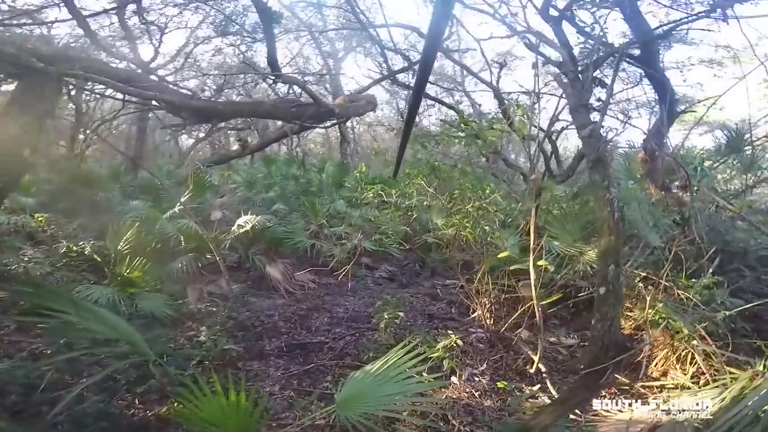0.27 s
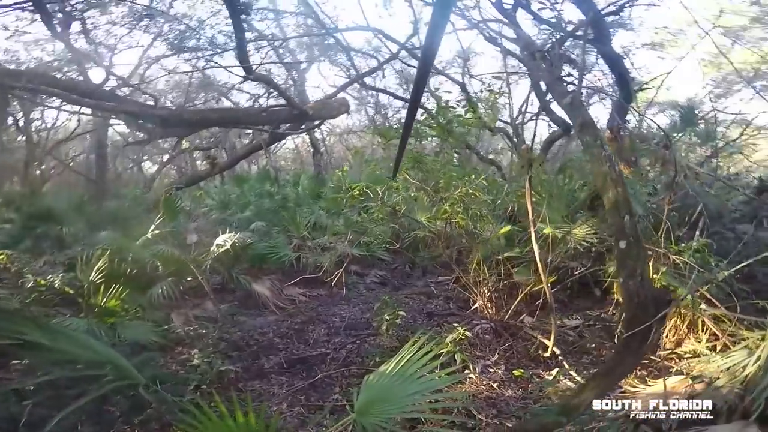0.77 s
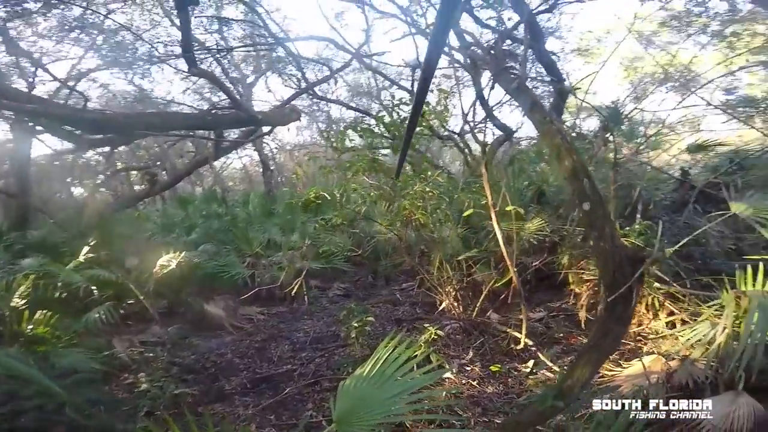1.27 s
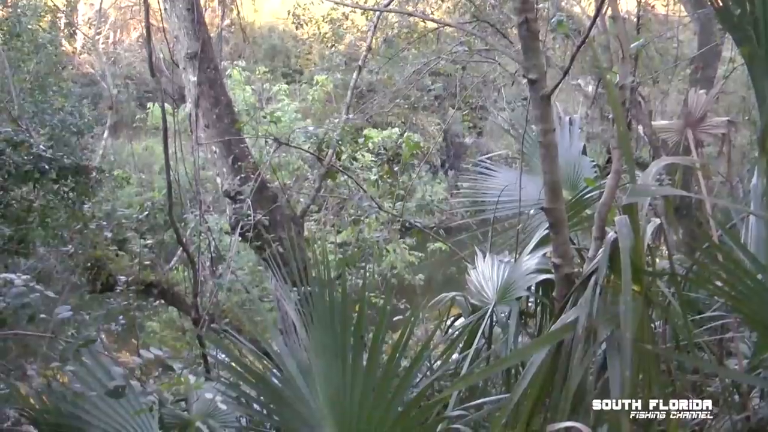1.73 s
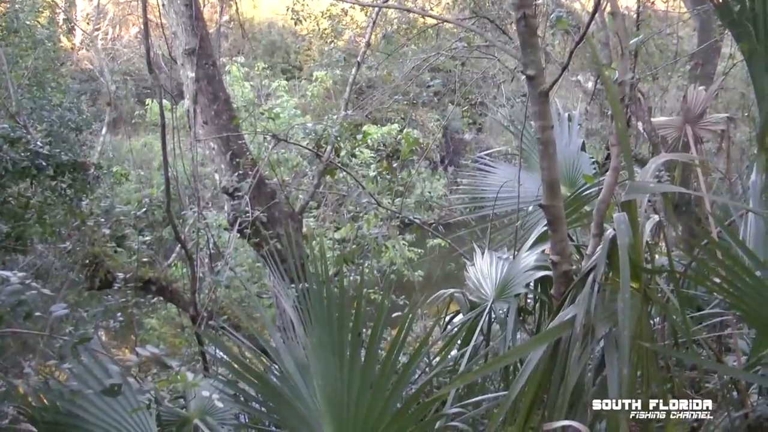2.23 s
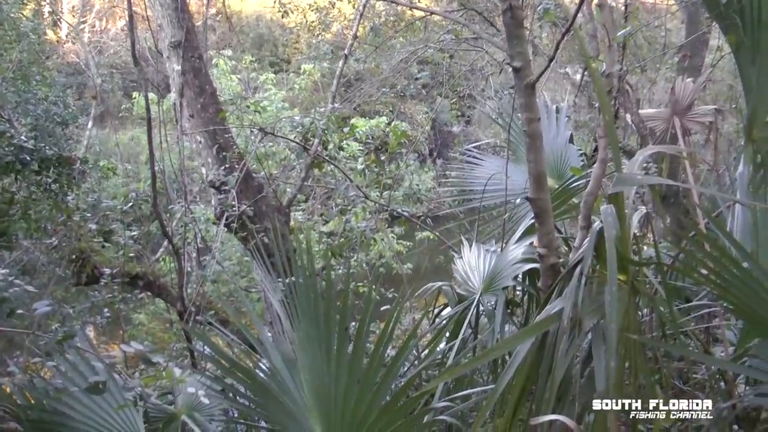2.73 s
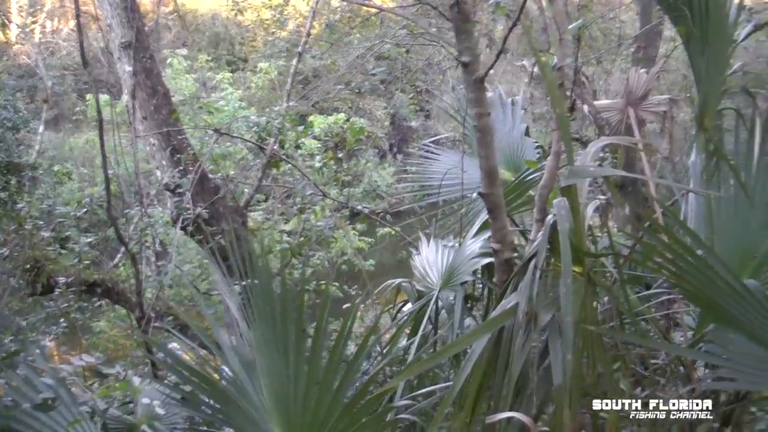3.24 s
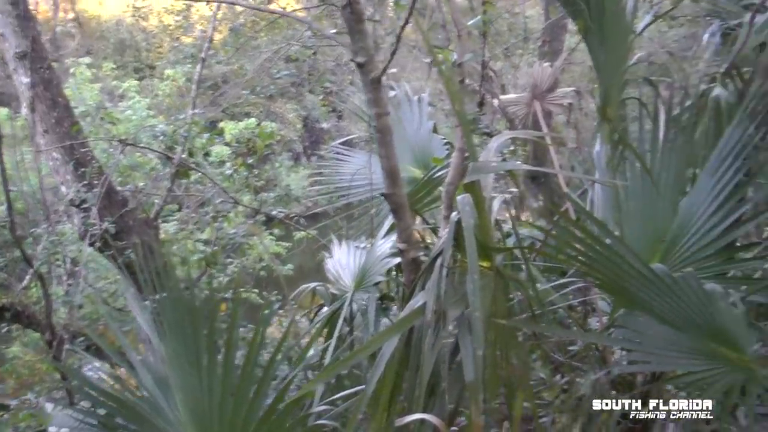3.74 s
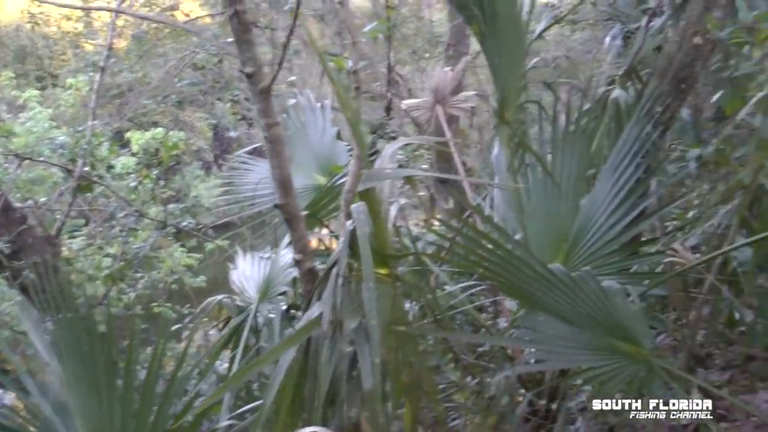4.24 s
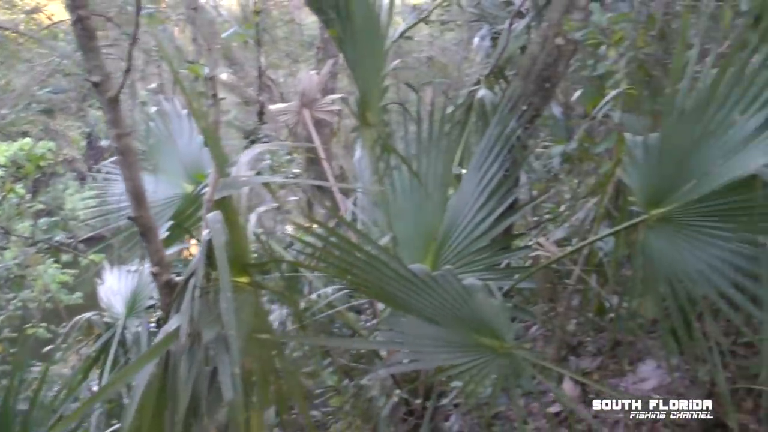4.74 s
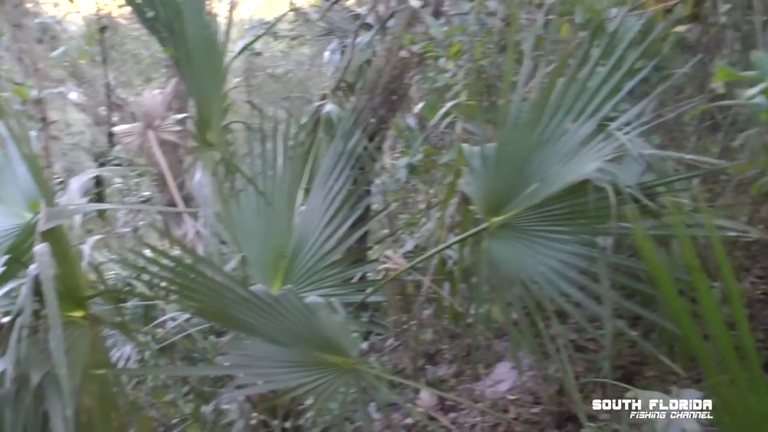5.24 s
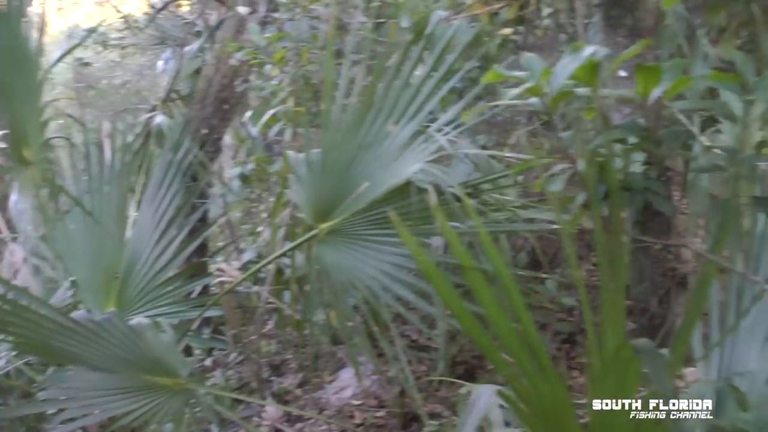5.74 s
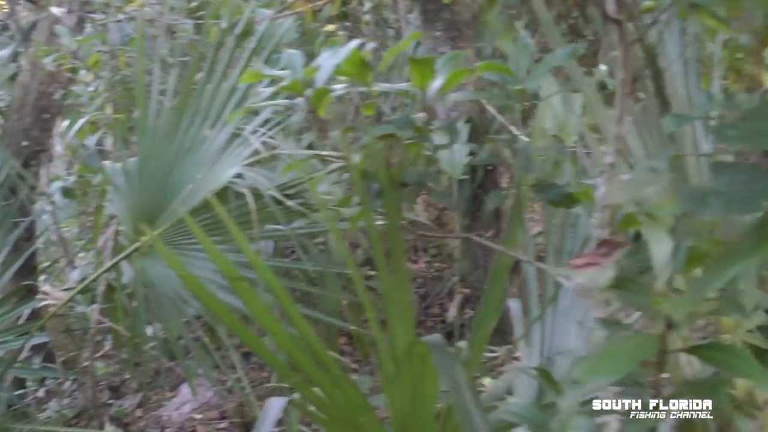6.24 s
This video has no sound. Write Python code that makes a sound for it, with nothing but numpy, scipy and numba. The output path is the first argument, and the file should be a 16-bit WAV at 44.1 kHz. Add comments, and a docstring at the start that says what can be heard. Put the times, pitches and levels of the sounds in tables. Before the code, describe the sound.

At first the microphone is shut inside a plastic housing on a swaying pole: a muffled low hum, a few knocks and small creaks. A sudden cut opens onto woodland in stereo, with a high cricket chorus, soft hiss, rumble and a distant wavering drone. Two nearer crickets repeat double chirps. Dry palm fronds swish and tick lightly as someone brushes past, while the drone and chorus slowly grow louder.

```python
"""Woodland in two scenes. First, inside a closed housing on a swaying pole, the pole's bending modes hum
low, knocks ring its stiffer modes, and the plastic creaks by stick-slip over a muffled hiss. At 1.64 s
a hard cut leads to open air in stereo: rumble, a far drone with a wavering tone, hiss and a chorus of
stridulating crickets. Then two near crickets chirp, and dry palm fronds swish and tick as someone
brushes past. Drone and chorus grow slowly louder, the drone faster towards the end."""
import sys
import numpy as np
from scipy import signal
from scipy.fft import rfft, irfft
from scipy.io import wavfile
from scipy.ndimage import uniform_filter1d
from numba import njit

SR = 44100
rng = np.random.default_rng(int(sys.argv[2]) if len(sys.argv) > 2 else 0)


def digitize_waveform(pressure):
    """Quantize a signal to 16-bit integers and store it at the path in sys.argv[1].

    Rows of a 2-D input are taken as channels; values are limited to [-1, 1].
    """
    field = np.atleast_2d(pressure).T
    bounded = np.clip(field, -1, 1)
    quanta = np.round(bounded * 32767).astype(np.int16)
    wavfile.write(sys.argv[1], SR, quanta)


N = 286650
TIME = np.arange(N) / SR
CUT_S, GAP_S, FADE_S = 1.6365, .007, .006

def undb(db):
    """Amplitude ratio of a level in decibels."""
    return 10 ** (np.asarray(db) / 20)

def at_rms(x, db):
    """Normalisation to an rms level."""
    return x * undb(db) / np.sqrt(np.mean(x ** 2))

def curves(table):
    """Linear interpolation of each column over time."""
    times, *columns = np.transpose(table)
    return [np.interp(TIME, times, column) for column in columns]

def lookup(table, hz):
    """Interpolation on a logarithmic frequency axis."""
    f, values = np.transpose(table)
    return np.interp(np.log(np.maximum(hz, 1)), np.log(f), values)

def resonate(x, modes):
    """Modal superposition: parallel resonators (f/Hz, bandwidth/Hz, gain/dB) driven by x."""
    return sum(undb(db) * signal.lfilter(*signal.iirpeak(hz, hz / width, fs=SR), x)
               for hz, width, db in modes)

def wander(rate):
    """Random modulation: `rate` values a second, smoothed twice; spread near 1."""
    hold = int(SR / rate)
    steps = np.repeat(rng.standard_normal(N // hold + 1), hold)
    return 1.3 * uniform_filter1d(uniform_filter1d(steps, hold), hold)[:N]

def impulses(events):
    """Impulse train from rows of t/s, level/dB."""
    out = np.zeros(N)
    for start, db in events:
        out[int(start * SR)] += undb(db)
    return out

def bursts(events, attack_s, decay_s):
    """Convolution gives each impulse an exponential rise and decay."""
    t = np.arange(int(6 * decay_s * SR)) / SR
    envelope = np.exp(-t / decay_s) * (1 - np.exp(-t / attack_s))
    return signal.fftconvolve(impulses(events), envelope)[:N]

# Likeness of left and right: f/Hz, correlation/1
CORRELATION = [(60, 0.92), (130, 0.97), (290, 0.83), (640, 0.61), (1410, .67), (3100, 0.72), (6820, 0.58),
               (9000, 0.98), (10000, 1), (15000, 1.0)]
# Left minus right: f/Hz, level/dB
BALANCE = [(60, -1), (110, 1), (200, 1), (380, -3), (700, -3.5), (1290, -3.0), (2380, -1.5), (4400, 0),
           (8120, 0), (15000, 0.5)]
def noise_field(spectrum, flicker_db, rate, wide=1):
    """Partially coherent stereo noise of rms 1; each octave flickers independently."""
    hz = np.fft.rfftfreq(N, 1 / SR)
    common, own = rfft(rng.standard_normal((2, N)))
    correlation = np.clip(1 - wide * (1 - lookup(CORRELATION, hz)), 0, 1)
    lean = undb(wide * lookup(BALANCE, hz) / 2)
    side = np.sqrt((1 - correlation) / (1 + correlation)) * own
    stereo = undb(lookup(spectrum, hz)) * np.array([(common + side) * lean, (common - side) / lean])
    stereo *= (hz > spectrum[0][0]) & (hz < spectrum[-1][0])
    octave = np.log2(np.maximum(hz, 1) / 30)
    bands = (irfft(stereo * np.clip(1 - abs(octave - k), 0, 1), N) for k in range(-1, 11))
    return at_rms(sum(band * undb(flicker_db * wander(rate)) for band in bands), 0)

# Low bending mode of the pole: t/s, f/Hz, level/dB
SWAY = [(0.0, 35.7, -33), (0.054, 36, -38), (0.098, 35.6, -20), (0.18, 36.4, -26.5), (0.272, 37.1, -41),
        (0.38, 36.3, -26.5), (0.548, 37.1, -39.5), (0.576, 37.0, -32), (0.594, 36.9, -44),
        (0.622, 36.3, -30.5), (0.676, 34.4, -33), (0.93, 34.25, -34), (0.998, 34.4, -51),
        (1.056, 34.4, -34), (1.106, 34.4, -31.5), (1.166, 34.3, -46), (1.248, 34.3, -34),
        (1.334, 35.5, -40), (1.38, 35.5, -31.5), (1.438, 35.4, -36.5), (1.548, 35.8, -24.5),
        (1.63, 35.7, -24.5)]
# Jolts that excite the upper mode: t/s, level/dB
JOLTS = [(0.062, -23.5), (0.21, -40), (0.325, -42), (0.575, -46), (0.64, -40), (0.76, -44), (0.86, -40.5),
         (0.985, -42), (1.04, -42), (1.125, -39), (1.21, -34), (1.44, -45), (1.61, -31)]
def pole_hum(upper_hz=127):
    """Flexural vibration in two narrow modes, both at a trough just before the cut."""
    low_hz, low_db = curves(SWAY)
    low = low_hz, np.sqrt(2) * undb(low_db)
    upper = upper_hz * (1 + .0202 * wander(7.3)), bursts(JOLTS, attack_s=.012, decay_s=.043)
    out = 0
    for hz, amplitude in (low, upper):
        phase = 2 * np.pi * np.cumsum(hz) / SR
        out -= amplitude * np.cos(phase - phase[int((CUT_S - .001) * SR)])
    return out

# Blows on the pole: t/s, relative level/dB
KNOCKS = [(0.062, -29), (1.037, -50), (1.611, -34)]
# Its stiffer modes: f/Hz, bandwidth/Hz, gain/dB
KNOCK_MODES = [(73, 14, -3), (183, 19, 3), (322, 28, -0.5), (700, 460, -15)]
def pole_knocks():
    """Impact excitation: a short force pulse with a noisy tail rings the stiffer modes."""
    pulse = bursts(KNOCKS, attack_s=.00038, decay_s=.0024)
    tail = .18 * bursts(KNOCKS, attack_s=.002, decay_s=.03) * rng.standard_normal(N)
    return undb(14.5) * resonate(pulse + tail, KNOCK_MODES)

# Noise in the closed housing: f/Hz, relative spectral level/dB
MUFFLED_SPECTRUM = [(35, -28), (60, -7), (91, -23), (136, -16.5), (188, -32.5), (742, -37), (1530, -45),
                    (2170, -43.5), (14300, -58.5), (15700, -68)]
def muffled_hiss():
    """Mono broadband noise, weighted towards the bass."""
    return undb(-51) * noise_field(MUFFLED_SPECTRUM, flicker_db=.49, rate=11.8, wide=0)[0]

# Creak onsets: t/s, relative level/dB
CREAKS = [(0.0633, -53), (0.099, -49), (0.121, -42.5), (0.1905, -54), (0.2229, -51), (0.5317, -52),
          (0.587, -51), (0.783, -47), (0.8305, -51), (0.946, -52), (1.121, -45.5), (1.1566, -36.5),
          (1.2336, -46.5), (1.294, -46), (1.3357, -45.5), (1.4042, -51), (1.4326, -55), (1.475, -54),
          (1.502, -51), (1.5434, -57), (1.6122, -57)]
# Modes of the plastic: f/Hz, bandwidth/Hz, gain/dB
HOUSING_MODES = [(1110, 150, -2.5), (1830, 200, -2), (1960, 200, -0.5), (2220, 170, -6), (3540, 790, -14)]
def housing_creaks():
    """Stick-slip friction: a tap and uneven slips ring the plastic; the shut case dulls the sound."""
    slips = rng.standard_normal(N) * undb(3.25 * rng.exponential(size=N) - 8.5)
    slips *= bursts(CREAKS, attack_s=.0004, decay_s=.012)
    plastic = resonate(undb(19.5) * impulses(CREAKS) + slips, HOUSING_MODES)
    return undb(6.5) * resonate(plastic, [(1100, 580, -1.5), (2020, 830, -.5)])

# Tone within the drone: t/s, f/Hz, level/dB
DRONE_TONE = [(1.66, 342, -45.5), (3.1, 344.2, -44), (3.6, 341.7, -47.5), (4.1, 342, -38), (4.7, 338, -40),
              (4.76, 343, -31.5), (5.03, 345, -35), (5.1, 341.8, -41), (5.72, 322, -44), (5.78, 322, -28.5),
              (5.9, 340, -34.5), (6.0, 326, -34.5), (6.22, 338, -30.5), (6.5, 342, -31)]
def wavering_tone():
    """Random amplitude and frequency modulation of a sinusoid, a little to the right."""
    hz, db = curves(DRONE_TONE)
    amplitude = undb(db + 2.8 * wander(35))
    phase = 2 * np.pi * np.cumsum(hz + 4.99 * wander(25)) / SR
    return amplitude * np.sin(phase + np.array([[-.2], [.2]])) * undb([[-1.2], [1.2]])

# Deep bass and far drone, each: f/Hz, relative spectral level/dB
RUMBLE_SPECTRUM = [(15, -35), (25, -17), (43, 1.5), (75, -7), (110, -21)]
DRONE_SPECTRUM = [(50, -59), (85, -11.5), (124, -4.5), (296, -1.5), (332, -4), (372, -4.5), (486, -13),
                  (544, -8), (642, -15), (741, -10), (814, -14), (902, -22.5), (1000, -28), (1300, -55),
                  (2200, -120)]
def rumble_and_drone(swell_from_s=4.93):
    """Low-frequency noise: a steady rumble under a drone that grows, faster near the end."""
    rumble = undb(-48.5) * noise_field(RUMBLE_SPECTRUM, flicker_db=.86, rate=6.2)
    drone_db = -34.5 + .7 * (TIME - CUT_S) + np.maximum(TIME - swell_from_s, 0)
    return rumble + undb(drone_db) * noise_field(DRONE_SPECTRUM, flicker_db=.71, rate=15)

# Middle and treble bands of the air, each: f/Hz, relative spectral level/dB
MIDDLE_SPECTRUM = [(850, -45), (1000, 2), (1420, -0.5), (1570, -5), (1790, 0), (2500, -8), (3500, -13),
                   (5800, -22)]
TREBLE_SPECTRUM = [(5800, -0.5), (6500, -1.5), (7200, -1), (8200, 1), (9300, 2.5), (10500, -3),
                   (12500, -3.5), (15000, -4.5), (15800, -13)]
# Course of the treble band: t/s, level/dB
TREBLE_LEVEL = [(1.66, -62.5), (2.7, -62.5), (3.1, -61), (3.68, -57.5), (4.4, -58.5), (5.1, -61),
                (5.88, -58.5), (6.5, -58.5)]
def air_hiss():
    """Band-limited noise: the middle band rises steadily while the treble swells and ebbs."""
    middle = noise_field(MIDDLE_SPECTRUM, flicker_db=.66, rate=11)
    treble = noise_field(TREBLE_SPECTRUM, flicker_db=.7, rate=15)
    return undb(-50 + .95 * (TIME - CUT_S)) * middle + undb(curves(TREBLE_LEVEL)[0]) * treble

@njit
def add_tone_bursts(out, start, omega, length, left, right, lag, octave):
    """Rotating phasors make round-topped tone bursts with an octave; time is in samples."""
    for k in range(len(start)):
        n, first = int(length[k]), int(start[k])
        carrier = window = 1 + 0j
        carrier_step, window_step = np.exp(1j * omega[k]), np.exp(1j * np.pi / n)
        right_shift = np.exp(-1j * lag[k])
        for i in range(min(n, out.shape[1] - first)):
            carrier *= carrier_step
            window *= window_step
            tone = (carrier + octave * carrier * carrier) * max(window.imag, 0.) ** .7
            out[0, first + i] += left[k] * tone.imag
            out[1, first + i] += right[k] * (tone * right_shift).imag

def wing_strokes(starts, hz, length_s, db, pan_db, lag, octave_db):
    """Stridulation: one tone burst a stroke, placed by level difference and right phase lag (rad)."""
    out, each = np.zeros((2, N)), np.ones(len(starts))
    left, right = undb(db + pan_db / 2), undb(db - pan_db / 2)
    add_tone_bursts(out, starts * SR, hz * 2 * np.pi / SR, each * length_s * SR,
                    left, right, each * lag, float(undb(octave_db)))
    return out

# Far singers by pitch: f/Hz, relative level/dB
CHORUS_SPECTRUM = [(3700, -18), (4000, -9.5), (4300, -3.5), (4650, -0.5), (4900, -2), (5200, -4.5),
                   (5350, -7.5), (5500, -20), (5800, -19.5)]
def cricket_chorus(singers=160, strokes=400):
    """Incoherent summation of far trills, each with its own pitch, stroke rate and side."""
    pace, offset, place, _ = rng.random((singers, 4)).T[..., None]
    detune, jitter, accent = rng.standard_normal((singers, strokes, 3)).transpose(2, 0, 1)
    hz = np.linspace(CHORUS_SPECTRUM[0][0], CHORUS_SPECTRUM[-1][0], singers)[:, None]
    hz = hz * (1 + .0035 * detune)
    period = .014 + .014 * pace
    starts = CUT_S - period * offset + np.cumsum(period * (1 + .08 * jitter), axis=1)
    db = lookup(CHORUS_SPECTRUM, hz) + .91 * accent
    side = np.repeat(2 * place - 1, strokes)
    trills = wing_strokes(starts.ravel(), hz.ravel(), .0137, db.ravel(),
                          pan_db=-1.6 + 2.5 * side, lag=.63 * side, octave_db=-31)
    return undb(-47.5 + .58 * (TIME - CUT_S)) * at_rms(trills, 0)

# Brushed fronds: t/s, rms level/dB, duration/s, centre f/Hz
SWISHES = [(1.75, -68, .08, 5900), (1.996, -58.5, .105, 7000), (3.1, -60.5, .09, 9000),
           (3.318, -60, 0.14, 7000), (3.44, -60.5, 0.12, 7000), (3.519, -54.5, 0.076, 6960),
           (3.588, -57.5, 0.049, 8500), (3.648, -54, .07, 7950), (3.743, -57, .06, 11000),
           (3.82, -57, 0.16, 10000), (3.824, -53, 0.1, 4200), (3.984, -58, 0.12, 9000),
           (4.056, -57, .06, 9000), (4.138, -59, 0.046, 8000), (4.213, -53.5, 0.07, 12500),
           (4.279, -52, .13, 6940), (4.421, -61, 0.12, 9000), (4.476, -59, 0.2, 6460),
           (4.894, -55.5, .075, 6900), (4.94, -62, .06, 12000), (5.103, -66, .075, 7500),
           (5.638, -59, .08, 9000), (5.77, -62, .065, 11000), (6.078, -62, 0.099, 11000),
           (6.232, -61, 0.13, 8000)]
def frond_swishes(relative_width=.7):
    """Crackling noise: a swarm of tiny cracks swells fast and dies away."""
    out = np.zeros((2, N + SR))
    for start, db, length_s, hz in SWISHES:
        first, n = int(start * SR), int(length_s * SR)
        cracks = rng.standard_normal((2, n)) * undb(2 * rng.exponential(size=n))
        clumps = undb(3.5 * np.repeat(rng.standard_normal(n // 100 + 1), 100)[:n])
        common, side = cracks * clumps
        envelope = np.sin(np.pi * np.linspace(0, 1, n) ** .45) ** 2
        swarm = (common + .12 * side * np.array([[1], [-1]])) * envelope
        swish = resonate(swarm, [(hz, relative_width * hz, 0), (6300, 3000, 0)])
        out[:, first:first + n] += at_rms(swish, db)
    return out[:, :N]

# Double chirps of the nearest cricket and of a higher one further off:
# t/s, first note level/dB, second note level/dB
NEAR_CHIRPS = [(1.916, -41.5, -40), (2.416, -39.5, -41), (2.911, -47, -43.5), (3.406, -44, -45),
               (3.903, -42.5, -42), (4.4, -34.5, -36), (4.895, -40.5, -42), (5.393, -39.5, -36.5),
               (5.898, -35.5, -38.5), (6.398, -36.5, -36.5)]
FURTHER_CHIRPS = [(1.751, -44, -44), (2.18, -46, -46), (2.653, -45, -48), (3.129, -47, -46),
                  (3.59, -50, -50), (5.8386, -44, -56), (6.2694, -45, -50)]
def cricket(chirps, hz, gap_s, note_s, pan_db, echo_loss_db, echoes=4):
    """Stridulation with early reflections: trunks and fronds return ever fainter copies of each note."""
    onsets, first_db, second_db = np.transpose(chirps)
    starts, db = np.r_[onsets, onsets + gap_s], np.r_[first_db, second_db]
    scatter, phase = rng.random((len(starts), echoes + 1, 2)).T
    pitch = hz * (1 + .0013 * (scatter[0] - .5))
    out = wing_strokes(starts, pitch, note_s, db, pan_db, lag=.075, octave_db=-28)
    for k in range(1, echoes + 1):
        arrivals = starts + .012 * (k + scatter[k])
        echo_hz = pitch * (1 + .0054 * (scatter[k] - .5))
        out += wing_strokes(arrivals, echo_hz, note_s, db - echo_loss_db - 2.5 * k, pan_db,
                            lag=2.4 * (phase[k] - .5), octave_db=-40)
    return out

# Single cracks of dry fronds: t/s, peak level/dB, centre f/Hz, bandwidth/Hz
TICKS = [(1.999, -39, 6500, 3000), (3.18, -42, 11000, 9000), (3.30, -39, 7000, 5000),
         (3.5213, -25.5, 4500, 4000), (3.5895, -45, 9000, 9000), (3.6464, -35, 6000, 8000),
         (3.746, -33, 1620, 750), (3.752, -41, 12000, 8000), (3.9871, -38, 13500, 7000),
         (4.0, -42, 14000, 4000), (4.065, -35, 13500, 9000), (4.115, -36, 3200, 1200),
         (4.1448, -38, 14000, 6000), (4.2216, -38, 13500, 4000), (4.343, -43, 12500, 4000),
         (4.468, -36, 3000, 1500), (4.8981, -45, 8000, 6000), (4.94, -45, 9000, 9000),
         (5.6494, -46, 9000, 9000), (6.3215, -34, 10000, 11000)]
def frond_ticks(samples=400):
    """Damped transients: the wider a crack's band, the faster it decays."""
    out = np.zeros(N)
    for start, db, hz, width in TICKS:
        crack = .34 * rng.standard_normal(samples) * np.exp(-np.arange(samples) * width / SR / 6.8)
        crack[0] = 1
        for bandwidth in (width, 2 * width):
            crack = resonate(crack, [(hz, bandwidth, 0)])
        first = int(start * SR)
        out[first:first + samples] += undb(db) * crack / abs(crack).max()
    return out

def scene():
    """Superposition of sources: the closed housing, a hard cut, a short gap, then open air."""
    closed = pole_hum() + pole_knocks() + housing_creaks() + muffled_hiss()
    woodland = wavering_tone() + rumble_and_drone() + air_hiss() + cricket_chorus()
    woodland += cricket(NEAR_CHIRPS, hz=4958, gap_s=.077, note_s=.04, pan_db=-.6, echo_loss_db=8)
    woodland += cricket(FURTHER_CHIRPS, hz=5190, gap_s=.058, note_s=.03, pan_db=-1.5, echo_loss_db=3)
    woodland += frond_ticks() + frond_swishes()
    fade_in = np.clip((TIME - CUT_S - GAP_S) / FADE_S, 0, 1)
    return (TIME < CUT_S) * closed + fade_in * woodland

def record(dry, cutoff_hz=15750):
    """Band limiting: a steep elliptic low-pass removes the highest treble."""
    return signal.sosfilt(signal.ellip(10, .2, 70, cutoff_hz, fs=SR, output="sos"), dry)

dry = scene()
out = record(dry)
digitize_waveform(out)
```